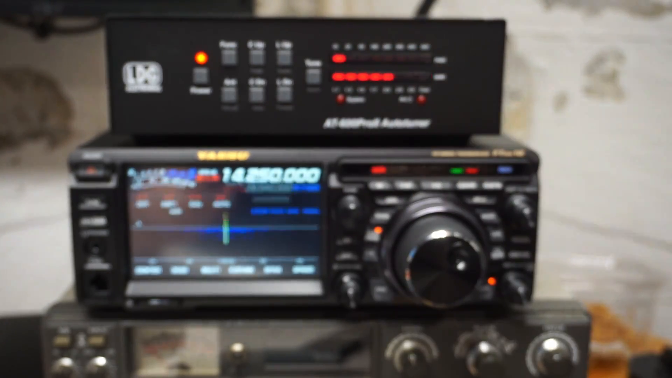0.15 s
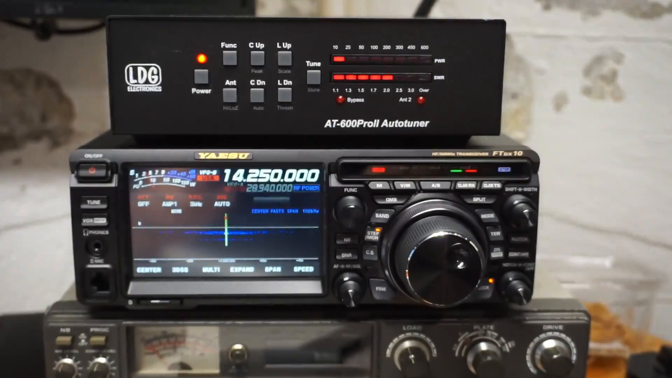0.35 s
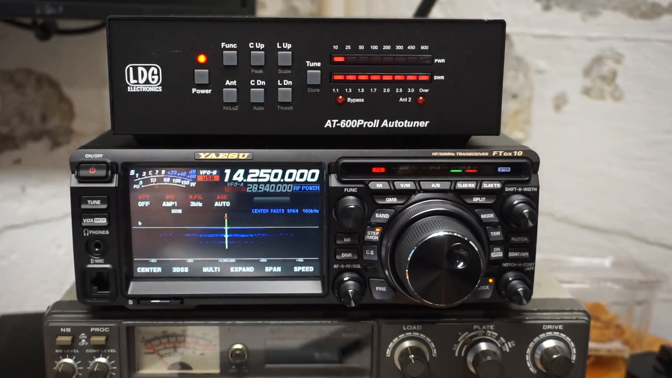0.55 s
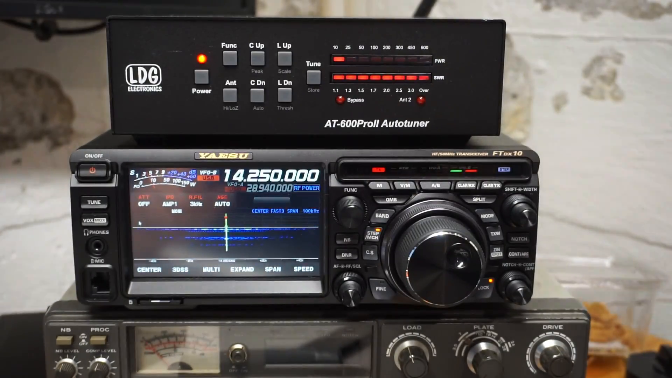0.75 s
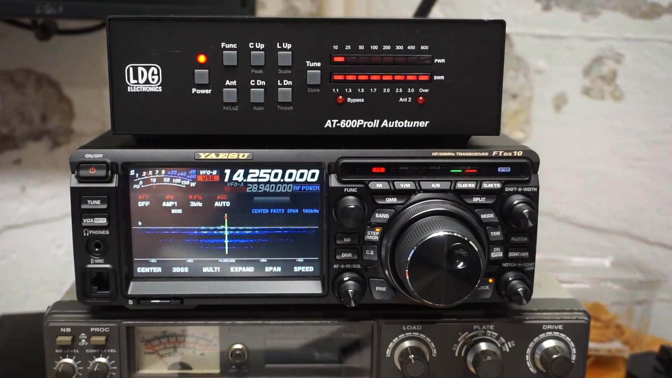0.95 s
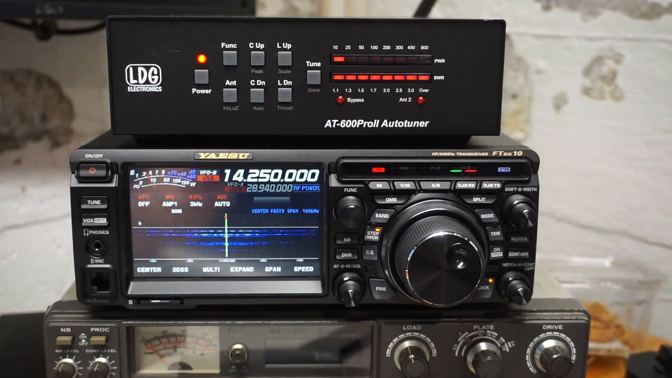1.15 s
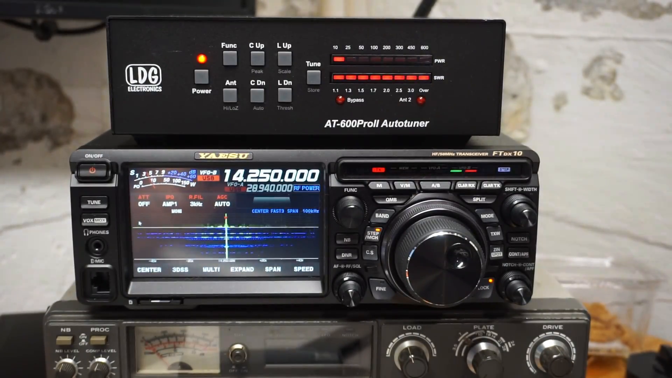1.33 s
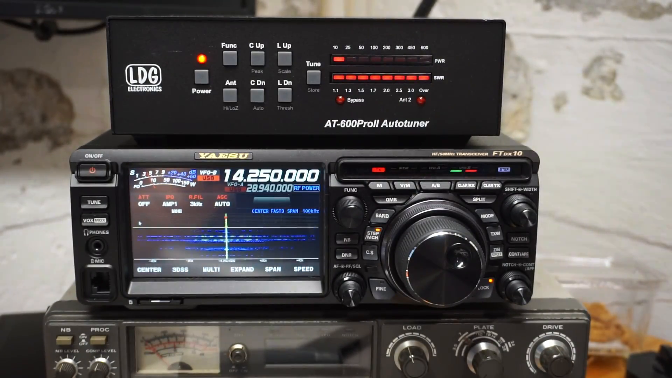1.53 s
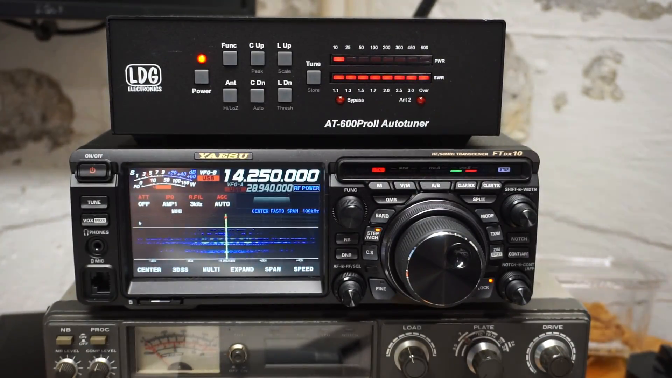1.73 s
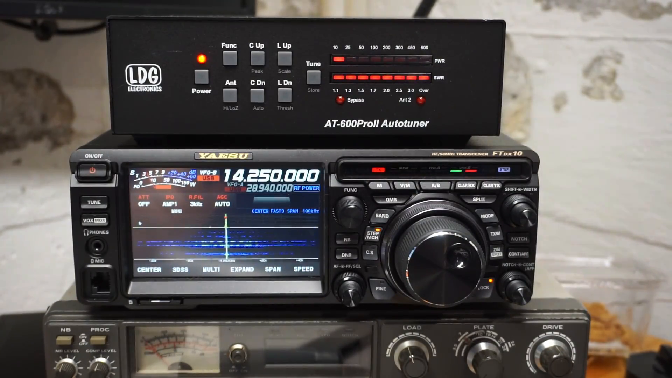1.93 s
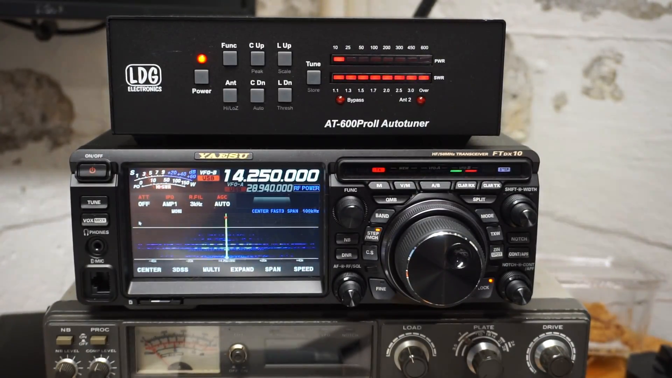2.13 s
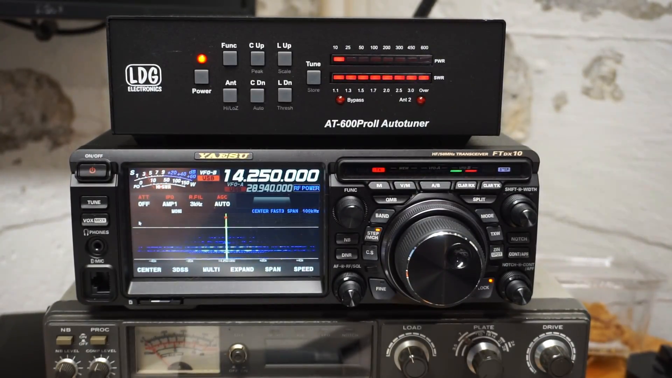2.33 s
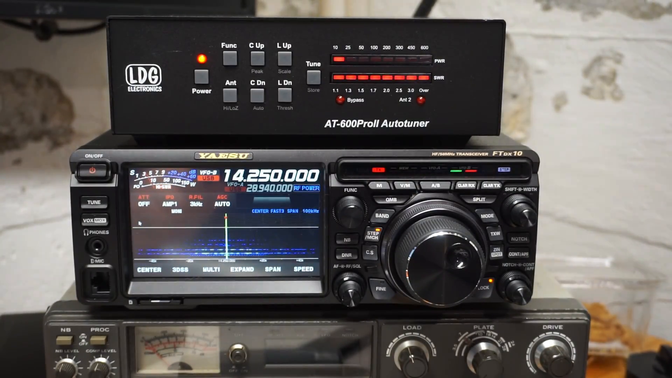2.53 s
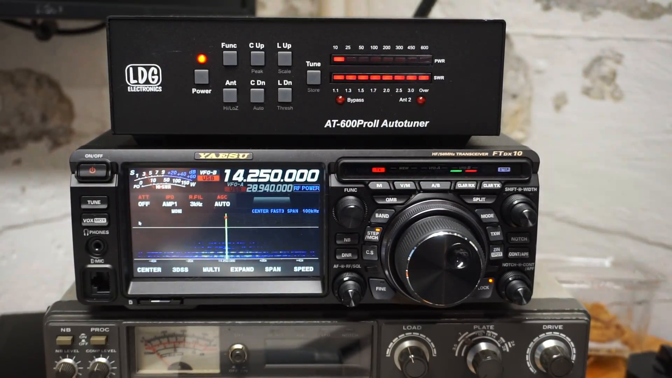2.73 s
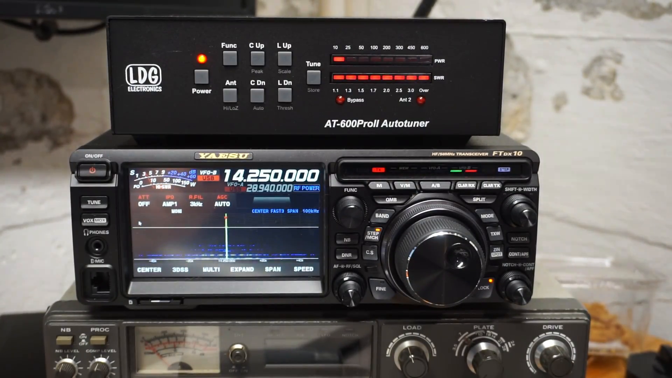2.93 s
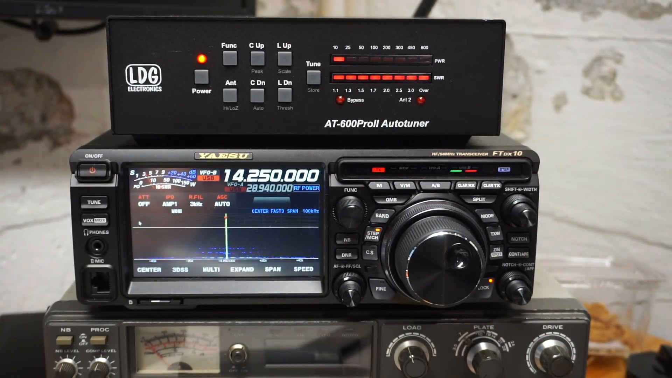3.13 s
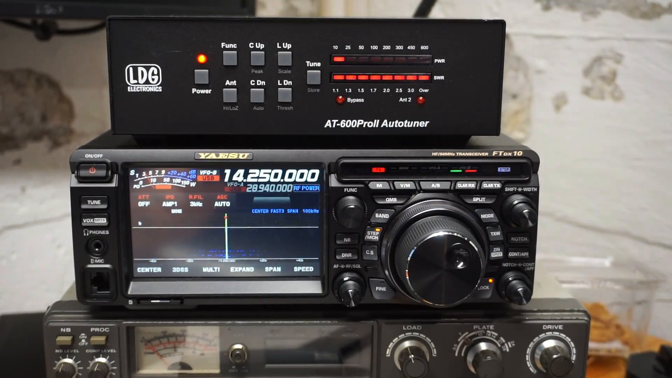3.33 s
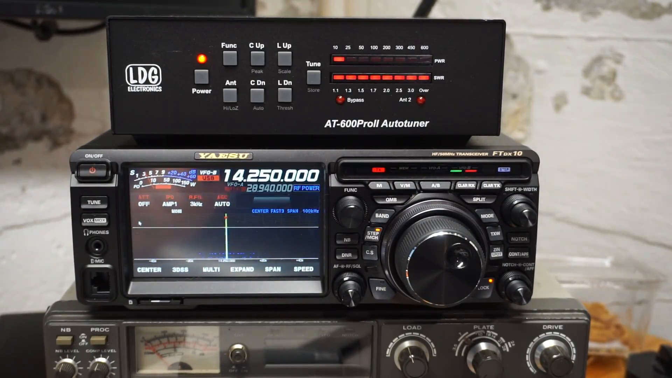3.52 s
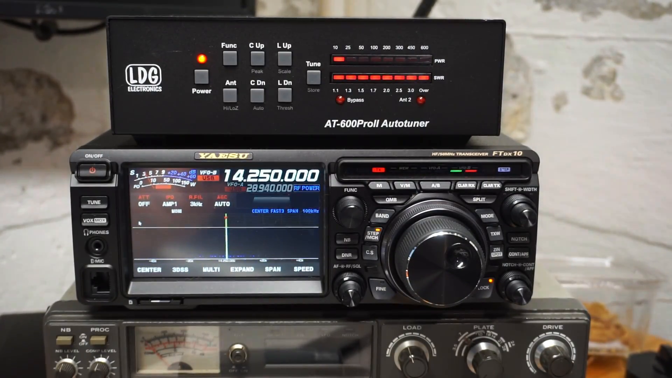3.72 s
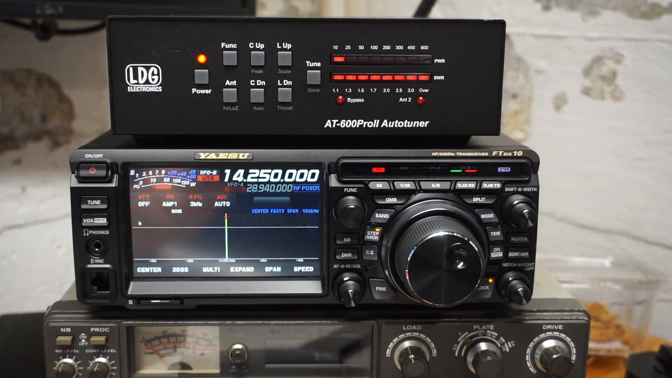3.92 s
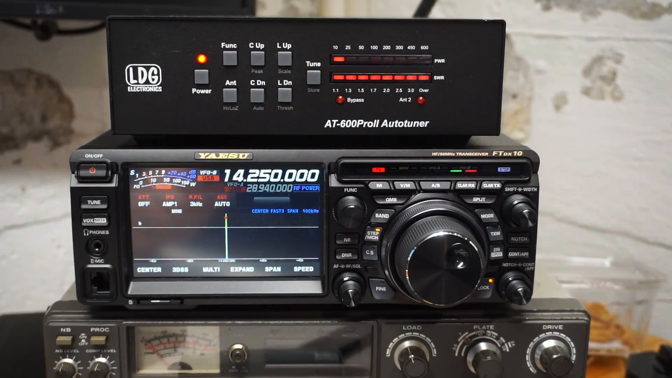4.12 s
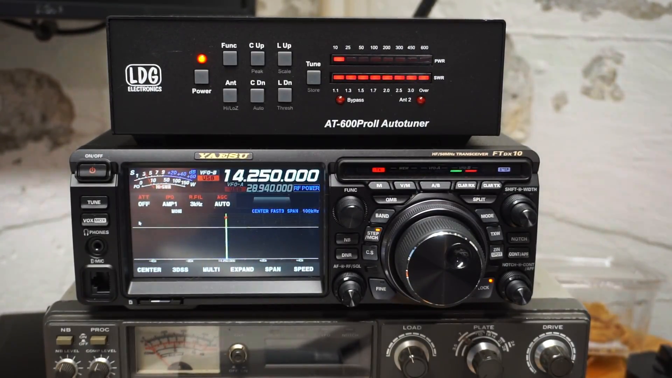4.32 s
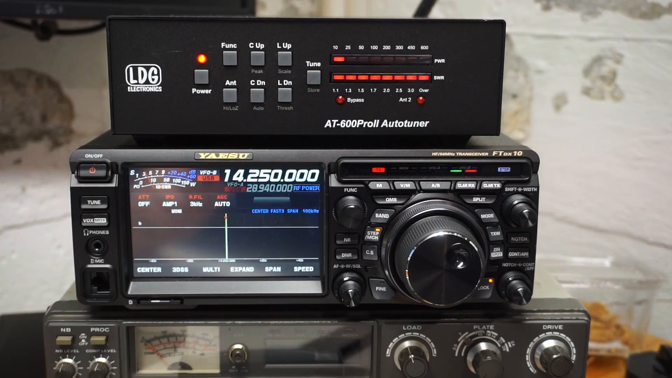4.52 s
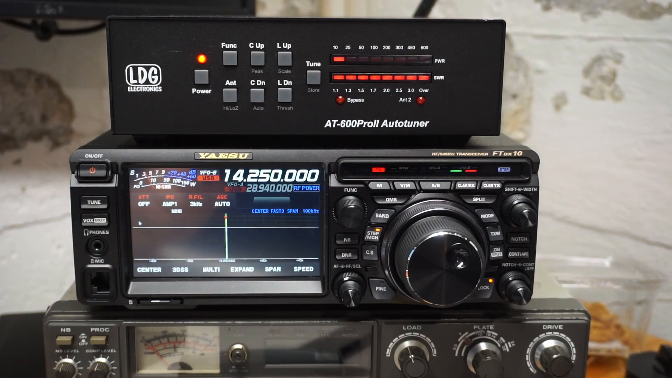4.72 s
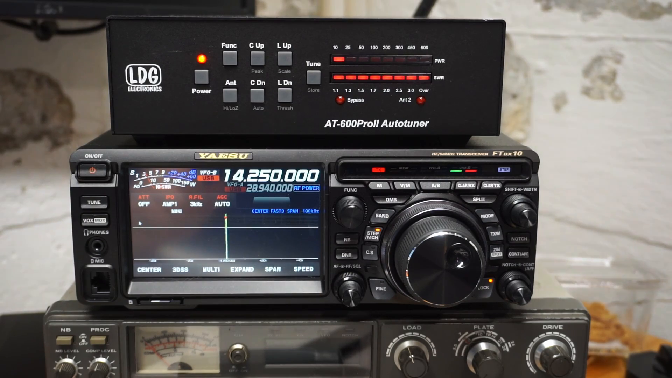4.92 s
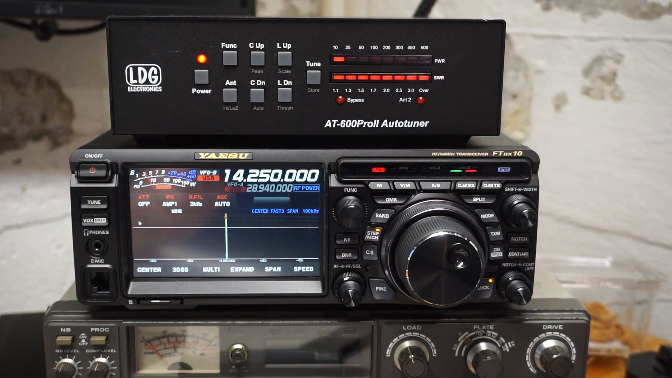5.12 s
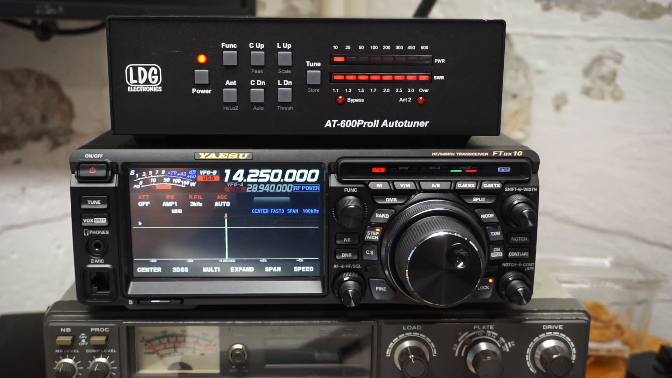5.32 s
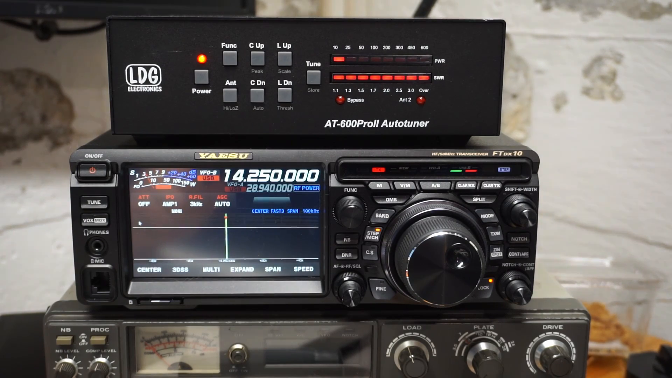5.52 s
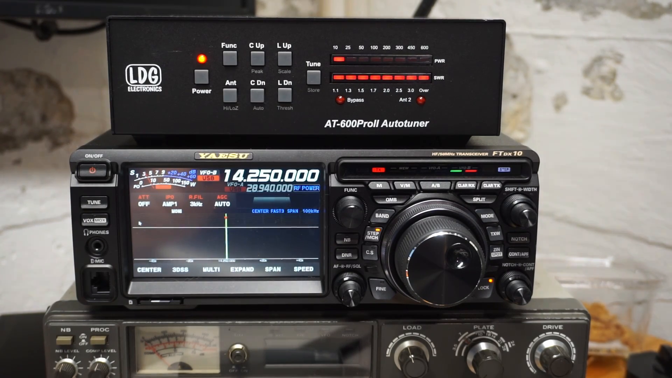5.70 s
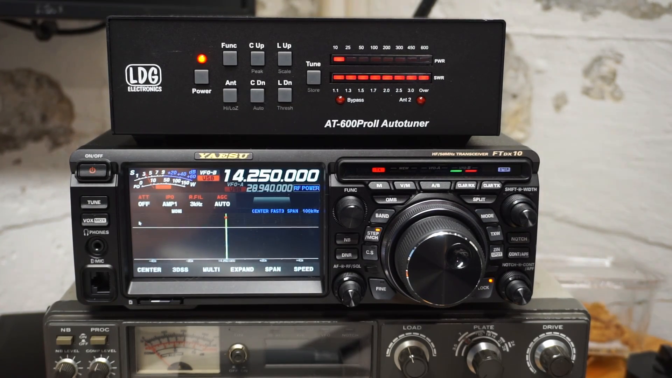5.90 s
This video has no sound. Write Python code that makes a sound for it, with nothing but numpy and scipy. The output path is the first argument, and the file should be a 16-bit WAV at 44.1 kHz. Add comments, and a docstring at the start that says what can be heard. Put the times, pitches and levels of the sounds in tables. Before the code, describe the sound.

Close-up relays clack sparsely, then rattle in a rapid looping pattern with a hollow droning hum beneath, growing quieter toward the end.

```python
"""The relays of an automatic antenna tuner, close up, in a quiet room that rumbles faintly throughout.
First come a few separate clacks, after which undamped springs sing on as decaying clusters of modes.
Then the search repeats one round of relays, a fast chatter that is strongest early and later grows softer.
Each impact is shaped noise plus panel modes; the decaying modes of the lid merge into a low throbbing boom.
Three duller knocks, decaying bursts of noise, fall among the chatter."""
import sys
import numpy as np
from scipy import signal
from scipy.fft import rfft, irfft, next_fast_len
from scipy.io import wavfile
from scipy.ndimage import uniform_filter1d, map_coordinates

SR = 44100
rng = np.random.default_rng(int(sys.argv[2]) if len(sys.argv) > 2 else 0)


def inscribe(sig):
    """Save sig as 16-bit PCM at rate SR to the path in sys.argv[1].

    A 1-D sig is mono; a 2-D sig holds one channel per row.
    Samples are clipped to [-1, 1] before scaling.
    """
    pcm = np.round(np.clip(np.atleast_2d(sig).T, -1, 1) * 32767)
    wavfile.write(sys.argv[1], SR, pcm.astype(np.int16))


N = 267246

# Relays pulling in; those after SEARCH_START_S return in every round. Levels are before the force:
# start_s, snap_db, contact_db, spring_db, frame_db, rattle_db, case_db, lid_push_db
PULL_IMPACTS = [(-0.00042, -13.5, -21, -32, -32.5, -18.5, -18, -36.5),
                (0.0198, -13, -25, -31, -23, -25, -24, -60.0),
                (0.03747, -15.5, -27, -21, -27, -23, -20.5, -35),
                (0.18073, -27.0, -36, -29, -37, -22.5, -38.0, -42),
                (0.21435, -28, -28, -35, -28.5, -31, -24.5, -40.0),
                (0.29526, -26, -27.0, -29.0, -34, -29, -32, -33.5),
                (0.40952, -31.5, -22.5, -31.5, -23, -26.5, -24, -71),
                (0.44226, -24, -26, -32, -23, -29.5, -24, -49),
                (0.45965, -20, -25, -29, -29.5, -25.5, -35.5, -73),
                (0.47451, -24, -42, -27.5, -39, -20, -34, -39.5),
                (0.49226, -15.5, -23.5, -23.5, -26.5, -19, -25.5, -33),
                (0.51013, -17.0, -42, -48.0, -33, -24, -29.5, -32),
                (0.52457, -19.5, -23.5, -30, -31, -20.5, -48.0, -47),
                (0.54216, -15, -40.5, -46, -29.5, -25.5, -33, -42.5),
                (0.55982, -25.0, -28, -27, -36, -34, -36, -43.5),
                (0.57521, -14.5, -25, -28.5, -26.5, -19.5, -63, -41),
                (0.59075, -24, -25, -33.5, -34.5, -29, -33, -36.5),
                (0.60767, -27.5, -23, -26, -25.5, -25, -30, -46),
                (0.62536, -15.5, -29, -21.5, -26, -20.5, -31, -43.5),
                (0.64018, -17.5, -26, -43.5, -43.0, -24.5, -41, -38.5),
                (0.65745, -48.0, -48.0, -48.0, -48.0, -34.5, -30.5, -50),
                (0.67484, -24.5, -29, -22, -50, -20.0, -73, -36),
                (0.69206, -23, -35, -24.5, -40, -31.5, -24.5, -43.5),
                (0.70835, -24.5, -33, -30.5, -34.5, -24.5, -43, -60.0),
                (0.72482, -19, -28, -24.5, -26, -31.5, -24.5, -41),
                (0.74133, -21.5, -25, -33.5, -31, -19, -25, -80)]
# Relays letting go, a few milliseconds behind the beat, same columns:
# start_s, snap_db, contact_db, spring_db, frame_db, rattle_db, case_db, lid_push_db
RELEASE_IMPACTS = [(0.01003, -19, -24, -27, -31, -23, -21.0, -29),
                   (0.0426, -16.5, -21, -20.5, -42, -20, -27.5, -36),
                   (0.0596, -12.5, -28, -24, -40.0, -16, -14.5, -31),
                   (0.1885, -21, -20.5, -23, -42, -25, -24.5, -33.5),
                   (0.2009, -18, -30, -30, -37, -21, -27, -52), (0.3029, -13, -20, -31, -27, -15, -16, -31),
                   (0.4152, -17.5, -22.5, -28.5, -28, -20, -21.5, -36),
                   (0.44869, -19.5, -22, -31, -24.5, -20.5, -26, -47),
                   (0.4651, -14.5, -20.5, -24.0, -44, -19.5, -19.5, -30),
                   (0.4856, -41, -46, -51, -48.0, -48, -28, -37.5),
                   (0.4988, -31.5, -23.0, -22, -30, -34, -26, -34),
                   (0.5147, -18.0, -24.5, -31, -48.0, -34, -22.5, -31.5),
                   (0.535, -36, -46.0, -48.0, -52, -53, -31, -41.5),
                   (0.54845, -15, -23, -22, -34, -17.5, -18.5, -30.5),
                   (0.56828, -27.5, -30, -43, -48.0, -46.5, -22, -74),
                   (0.5812, -15, -25.5, -29, -26.5, -21, -20.5, -32.5),
                   (0.5985, -14.5, -24, -27, -35, -20.5, -20.0, -32),
                   (0.6178, -22.5, -38.5, -38.0, -55, -28, -37, -45),
                   (0.6312, -29, -22.5, -25.5, -21, -27.0, -19.5, -35),
                   (0.6477, -12.5, -19.5, -29, -61, -18.0, -16.5, -32),
                   (0.6664, -30, -37, -53, -54, -25, -40, -43),
                   (0.6816, -34, -23.0, -25.5, -28.5, -22.5, -27.5, -38),
                   (0.6976, -24, -21, -29, -33, -32.5, -23.5, -35),
                   (0.7145, -47.0, -48.0, -48.0, -35, -41, -39, -43),
                   (0.73071, -22.5, -23, -27, -24.5, -29, -19.0, -31.5)]
# How hard the relays strike over time: time_s, force_db
STRIKE_FORCE = [(0, 1.5), (.4, 1), (.55, 2.5), (1.1, -.5), (4.1, -0.97), (4.3, -3.5), (5, -6), (6.06, -6)]
# Spectrum of the armature's snap: frequency_hz, density_db (per Hz, relative)
SNAP_SPECTRUM = [(1800, -31), (2700, 0), (3100, -1.5), (3600, -1), (4200, -3.5), (4800, -2), (5700, 3.5),
                 (7400, 1.5), (8600, 1.5), (9400, -4), (10500, -6), (12500, -8.5), (14300, -8),
                 (15600, -3.5)]
# Spectrum of the tick of the contacts: frequency_hz, density_db (per Hz, relative)
CONTACT_SPECTRUM = [(5000, -45), (6800, -11), (7600, -0.5), (8200, 1.5), (8800, -5), (9600, -10.5),
                    (12500, -14.5), (15600, -13)]
# Spectrum of the zing of the spring: frequency_hz, density_db (per Hz, relative)
SPRING_SPECTRUM = [(3800, -28), (5000, -13), (5800, -13.5), (6300, -1.5), (6600, 3), (7000, -2.5),
                   (7500, -10), (9000, -15), (12000, -50)]
# Spectrum of the rattle of the board: frequency_hz, density_db (per Hz, relative)
RATTLE_SPECTRUM = [(700, -66), (1100, -10), (1400, -8.5), (1750, -1), (2100, 2), (2500, -1.5), (3100, -8),
                   (3500, -2), (4200, -3.5), (4900, -6.5), (5700, -9), (6500, -40), (9000, -60)]
# Spectrum of the clack of the case: frequency_hz, density_db (per Hz, relative)
CASE_SPECTRUM = [(40, -42), (100, -43), (160, -21), (250, 1.5), (330, -2.5), (420, -0.5), (570, -14.5),
                 (660, -11), (750, 6), (900, 2.5), (1100, -3.5), (1400, -0.5), (1900, -4.5), (2600, -14),
                 (4000, -50)]
# Share of its noise that a relay repeats exactly: frequency_hz, share (0 to 1)
REPEATED_SHARE = [(300, 0.61), (1100, 0.69), (2300, 0.7), (4000, 0.52), (12000, 0.14)]
# Panel modes of the sheet-metal case: pitch_hz, level_db (relative)
PANEL_MODES = [(722, -51.5), (748, -45.5), (783, -44), (822, -50.5), (883, -47.5), (904, -57),
               (1006, -46.5), (1205, -44), (1270, -48), (1350, -43.5), (1390, -47.5), (1546, -59.5),
               (1731, -44), (1835, -51.5), (2025, -45.5), (2104, -43.5), (2360, -44.5), (2669, -48),
               (3282, -44.5), (3845, -49.5)]
# Low modes of the lid: pitch_hz, level_db, t60_s, swing (signed factor)
LID_MODES = [(270.6, -12.5, 0.22, 1), (306.3, -13, 0.63, 1), (338.5, 6.5, 0.13, 1),
             (349.43, 11, 0.32, 0.97), (353.17, 11.5, 0.27, -0.89)]
# Springs left ringing after the first clacks: start_s, pitch_hz, level_db, t60_s
FREE_SPRINGS = [(.21, 2880, -32, .15), (.0614, 6950, -33, .17)]
# Duller knocks among the chatter: start_s, level_db
KNOCK_TIMES = [(1.696, -25.5), (2.395, -20), (5.183, -23.5)]
# Spectrum of a knock: frequency_hz, density_db (per Hz, relative)
KNOCK_SPECTRUM = [(40, -52), (150, 4), (550, -35), (1200, -23), (1750, 19), (2300, -15), (5000, -9),
                  (15000, -45)]
# Spectrum of the room's rumble: frequency_hz, density_db (per Hz, relative)
ROOM_SPECTRUM = [(25, -14), (70, -24), (150, -17), (500, 20), (3000, -8), (15000, -23)]
# Left-right likeness of diffuse sound: frequency_hz, correlation (-1 to 1)
STEREO_LIKENESS = [(60, 0.06), (280, 1), (640, 0.91), (1400, 0.91), (3000, 0.63), (7000, 0.38),
                   (15000, 0.083)]
# Level difference between the capsules: frequency_hz, left_minus_right_db
STEREO_TILT = [(60, 4), (250, 5), (600, 5), (1100, 1.5), (2200, 6), (4000, 2), (6500, 7), (8200, 2),
               (12000, 5)]

SEARCH_START_S, ROUND_S = 0.405, 0.34865
SNAP_FOLLOWS, LID_FOLLOWS = 0.92, 0.82  # dB for each dB of force
PULL_FRAME_HZ, RELEASE_FRAME_HZ = 3792, 2695  # a frame rings higher with the armature closed
LID_LAG_S = 0.0017
LID_RADIATES_HZ = 151  # so small a lid gives off little below this
RING_SIZE = 8192  # samples in one impact
TOP_HZ = 15800


def amp(db):
    """Level to amplitude: 20 dB is a factor of ten."""
    return 10 ** (np.asarray(db) / 20)


def unit(x):
    """Normalization to a root mean square of 1."""
    return x / np.sqrt(np.mean(x ** 2) + 1e-20)


def along(points, hz):
    """Interpolation of (frequency, value) points on a logarithmic frequency axis."""
    f, v = np.transpose(points)
    return np.interp(np.log(hz + 1), np.log(f + 1), v)


def filtered(x, response):
    """Linear filtering: the spectrum is multiplied by a response of frequency."""
    n = x.shape[-1]
    m = next_fast_len(n + n // 10)
    return irfft(rfft(x, m) * response(np.fft.rfftfreq(m, 1 / SR)), m)[..., :n]


def add(track, s, sound):
    """Superposition: a sound is summed into a track from s seconds on."""
    part = track[..., max(round(s * SR), 0):][..., :sound.shape[-1]]
    part += sound[..., :part.shape[-1]]


def relays(snap_db=0.0, contact_db=0.0, spring_db=-0.23, frame_db=-0.88, rattle_db=-1.54, case_db=-2.5,
           low_panel_db=-4.0, high_panel_db=-2.5, scatter_db=0.5):
    """Impact excitation: each blow sounds the snap, contacts, spring, frame, board and case at once."""
    track, panel_modes = np.zeros((2, N)), panels()
    low = np.array(PANEL_MODES)[:, :1] < 1600  # these follow the case, the others the rattle
    for table, frame_hz in [(PULL_IMPACTS, PULL_FRAME_HZ), (RELEASE_IMPACTS, RELEASE_FRAME_HZ)]:
        for s, snap, contact, spring, frame, rattle, case, _ in table:
            times = moments(s)
            count = len(times)
            treble = amp(snap + snap_db) * burst(
                count, SNAP_SPECTRUM, attack=0.0044, t60=0.075,
                spike=2.7, spike_t60=0.008, vary_db=0.5, grain_db=-0.2)
            treble += amp(contact + contact_db) * burst(
                count, CONTACT_SPECTRUM, attack=0.00098, t60=0.12,
                spike=0.67, spike_t60=0.012, vary_db=0.6, grain_db=-0.7)
            treble += amp(spring + spring_db) * burst(
                count, SPRING_SPECTRUM, attack=0.0023, t60=0.1,
                spike=5.5, spike_t60=0.016, vary_db=1.1, grain_db=-1.6)
            body = amp(rattle + rattle_db) * burst(
                count, RATTLE_SPECTRUM, attack=0.0073, t60=0.09,
                spike=3.9, spike_t60=0.017, vary_db=0.76, grain_db=-0.7)
            body += amp(case + case_db) * burst(
                count, CASE_SPECTRUM, attack=0.0089, t60=0.065,
                spike=5.0, spike_t60=0.011, vary_db=0.6, grain_db=-0.8)
            body += amp(frame + frame_db) * burst(
                count, resonance(frame_hz), attack=0.0017, t60=0.098,
                spike=2.03, spike_t60=0.021, vary_db=0.5, grain_db=-0.3)
            panel_db = np.where(low, case + low_panel_db, rattle + high_panel_db)
            body += excite(panel_modes * amp(panel_db), count, spread_db=2.0)

            force_db, bright_db, _ = force(times)
            blows = amp(force_db + scatter_db * rng.standard_normal(count))
            for at, blow, bright, high, rest in zip(times, blows, amp(bright_db), treble, body):
                add(track, at, blow * (bright * high + rest))
    return track


def moments(s):
    """Periodicity: an impact happens once before the search and in every round during it."""
    return np.arange(s, N / SR, ROUND_S) if s > SEARCH_START_S else np.array([s])


def force(times):
    """Unequal scaling with force: returns force dB and the dB that treble and lid add, as they vary less."""
    force_db = np.interp(times, *np.transpose(STRIKE_FORCE))
    return force_db, (SNAP_FOLLOWS - 1) * force_db, (LID_FOLLOWS - 1) * force_db


def burst(count, spectrum, attack, t60, spike, spike_t60, vary_db, grain_db, colour_db=0.95, size=36):
    """Two-stage decay: a short noisy spike on top of a slower decay, made grainy by tiny bounces."""
    t = np.arange(RING_SIZE) / SR
    grain = uniform_filter1d(rng.standard_normal((count, 1, RING_SIZE)), size)
    bounces = amp(grain_db * unit(grain))
    noise = unit(irfft(relay_noise(count, spectrum, colour_db)) * bounces)
    noise *= amp(vary_db * rng.standard_normal((count, 1, 1)))
    decay = np.hypot(amp(-60 * t / t60), spike * amp(-60 * t / spike_t60))
    return noise * (1 - np.exp(-t / attack)) * decay


def relay_noise(count, spectrum, colour_db, vary_db=2.5):
    """Partial coherence: stereo noise spectra of one relay, partly shared by all its blows."""
    hz = np.fft.rfftfreq(RING_SIZE, 1 / SR)
    z = rng.standard_normal((count + 1, 2, len(hz), 2), dtype=np.float32).view(np.complex64)[..., 0]
    same = np.clip(along(REPEATED_SHARE, hz), 0, 1).astype(np.float32)
    knots = np.geomspace(1000, 16000, 26)
    draws = rng.standard_normal((count + 1, len(knots)))
    ripple = np.array([np.interp(hz, knots, row, left=0) for row in draws])
    # row 0 belongs to the relay, the other rows to its single blows
    colour = colour_db * ripple[0] + vary_db * ripple[1:]
    gain = amp(along(spectrum, hz) + colour).astype(np.float32)
    return gain[:, None] * (z[0] * np.sqrt(same) + z[1:] * np.sqrt(1 - same))


def resonance(hz, width=0.048):
    """Resonance curve: (Hz, dB) points of one broad peak with steep skirts."""
    ratios = np.geomspace(0.25, 4, 101)
    detuning = (ratios - 1 / ratios) / (2 * width)
    return np.column_stack([hz * ratios, -20 * np.log10(1 + detuning ** 2)])


def panels(t60=0.13, damping=0.016, attack=0.0023):
    """Modal vibration: one decaying wave for each panel mode, the higher ones fading very slightly faster."""
    t = np.arange(RING_SIZE) / SR
    hz, db = np.transpose(PANEL_MODES)[..., None]
    size = amp(db) / np.linalg.norm(amp(db))
    decay = amp(-60 * t / t60 * (hz / 1500) ** damping)
    return size * decay * np.exp(2j * np.pi * hz * t) * (1 - np.exp(-t / attack))


def excite(modes, count, spread_db, drift=0.1):
    """Modal participation: a relay's place on the board sets each mode, much the same at every blow."""
    sizes = amp(abs(spread_db) * np.clip(rng.standard_normal(len(modes)), -2, 2))
    turns = rng.random((2, len(modes))) + drift * rng.standard_normal((count, 2, len(modes)))
    return ((sizes * np.exp(2j * np.pi * turns)) @ modes).real


def lid(level_db=0.0, attack=0.0035, scatter_db=0.43):
    """Superposed modal decays: the lid outrings the gaps, so pushes merge into a tone throbbing each round."""
    t = np.arange(SR) / SR
    boom = np.zeros(SR)
    for hz, db, t60, way in LID_MODES:
        boom += way * amp(db - 60 * t / t60) * np.sin(2 * np.pi * hz * t)
    boom *= 1 - np.exp(-t / attack)
    track = np.zeros(N)
    for s, *_, push_db in [*PULL_IMPACTS, *RELEASE_IMPACTS]:
        times = moments(s)
        force_db, _, lid_db = force(times)
        pushes_db = push_db + force_db + lid_db + scatter_db * rng.standard_normal(len(times))
        for at, db in zip(times, pushes_db):
            add(track, at + LID_LAG_S, amp(db + level_db) * boom)
    radiation = signal.butter(2, LID_RADIATES_HZ, 'highpass', fs=SR, output='sos')
    return signal.sosfilt(radiation, track)


def long_rings():
    """Free vibration: a spring that nothing damps sings on into the pause."""
    track = np.zeros((2, N))
    for s, hz, db, t60 in FREE_SPRINGS:
        add(track, s, amp(db) * ping(1, hz, t60, detune=0.0043)[0])
    return track


def ping(count, hz, t60, attack=0.00063, detune=0.0141, drift=0.12, order=4):
    """Beating of close modes: a small steel part rings in a cluster, its phases differing left and right."""
    t = np.arange(RING_SIZE) / SR
    offsets = np.linspace(-1, 1, order)[:, None] * (1 + rng.random((order, 1)))
    pitches = hz * (1 + detune * offsets)
    wave = excite(np.exp(2j * np.pi * pitches * t), count, spread_db=0.0, drift=drift)
    envelope = amp(-60 * t / t60) * (1 - np.exp(-t / attack))
    return unit(wave * envelope) * np.sqrt(np.mean(envelope ** 2))


def knocks(t60=0.088, attack=0.0026):
    """Damped noise: now and then something in the case knocks, hollower than the relays."""
    track, t = np.zeros((2, N)), np.arange(RING_SIZE) / SR
    for s, db in KNOCK_TIMES:
        noise = rng.standard_normal((2, RING_SIZE))
        thud = unit(filtered(noise, lambda hz: amp(along(KNOCK_SPECTRUM, hz))))
        add(track, s, thud * amp(db - 60 * t / t60) * (1 - np.exp(-t / attack)))
    return track


def walls(x, wet_db=-25, t60=0.4, dull_hz=3500):
    """Reverberation: the small room answers with a weak, duller tail of decaying noise."""
    t = np.arange(SR // 3) / SR
    noise = rng.standard_normal((2, len(t)))
    tail = filtered(noise, lambda hz: 1 / np.hypot(1, hz / dull_hz)) * amp(-60 * t / t60)
    tail /= np.linalg.norm(tail[0])
    return x + amp(wet_db) * signal.fftconvolve(x, tail, axes=1)[:, :N]


def room(level_db=-68, swell_db=5, rate=12):
    """Amplitude-modulated noise: the faint rumble of a quiet room, swelling unevenly."""
    rumble = filtered(rng.standard_normal((2, N)), lambda hz: amp(along(ROOM_SPECTRUM, hz)))
    levels = rng.standard_normal(int(N * rate / SR) + 4)  # rate is random levels per second
    swell = map_coordinates(levels, [np.arange(N) * rate / SR])
    return amp(level_db) * unit(rumble * amp(swell_db * swell))


def microphones(diffuse, centre, lead_ms=0.062):
    """Interchannel coherence: two close capsules, the left a little earlier and louder."""
    def turn(hz):
        """Mixing angle whose mid-side sum has the wanted correlation."""
        return np.arccos(np.clip(along(STEREO_LIKENESS, hz), -1, 1)) / 2

    mid, side = filtered(diffuse, lambda hz: np.array([np.cos(turn(hz)), np.sin(turn(hz))]))
    half = np.array([[0.5], [-0.5]])  # each capsule takes half of the difference

    def capsules(hz):
        """Level and phase of each capsule against their mean."""
        return amp(half * along(STEREO_TILT, hz)) * np.exp(2j * np.pi * hz * half * lead_ms / 10 ** 3)

    return filtered(centre + np.array([mid + side, mid - side]), capsules)


def scene():
    tuner = walls(relays() + long_rings() + knocks())
    return microphones(tuner + room(), lid())


def record(dry):
    """Band limitation: nothing above TOP_HZ is kept."""
    return filtered(dry, lambda hz: hz < TOP_HZ)


dry = scene()
out = record(dry)
inscribe(out)
```